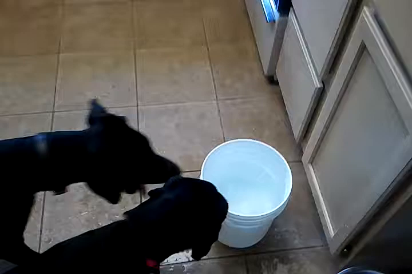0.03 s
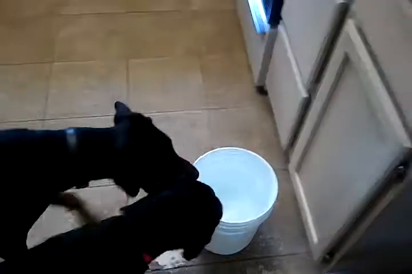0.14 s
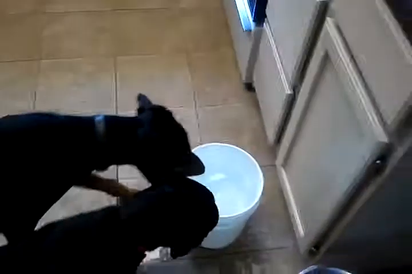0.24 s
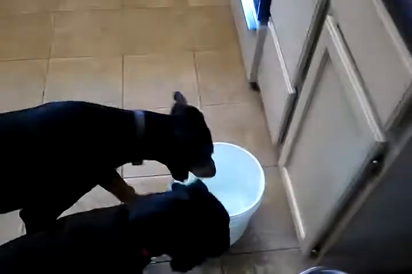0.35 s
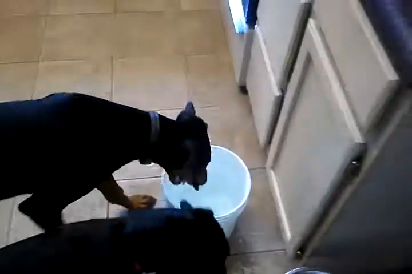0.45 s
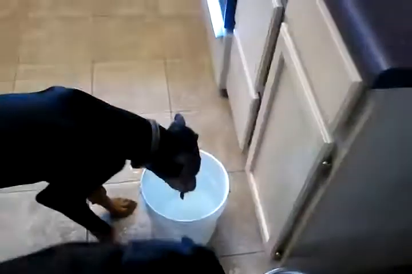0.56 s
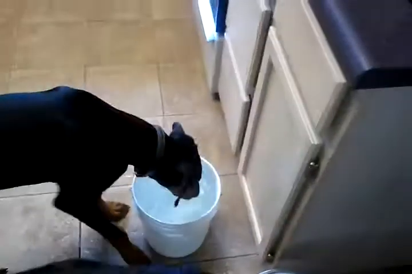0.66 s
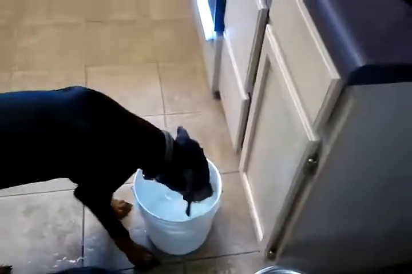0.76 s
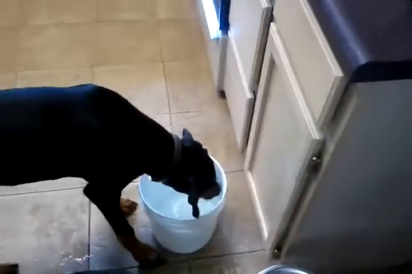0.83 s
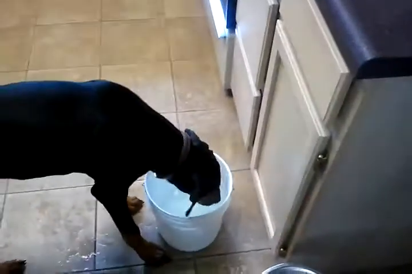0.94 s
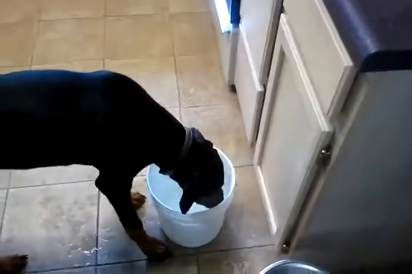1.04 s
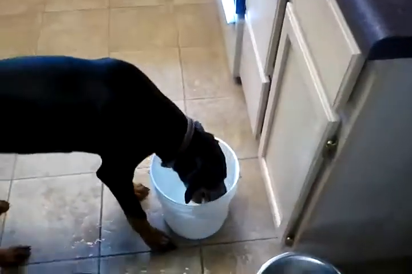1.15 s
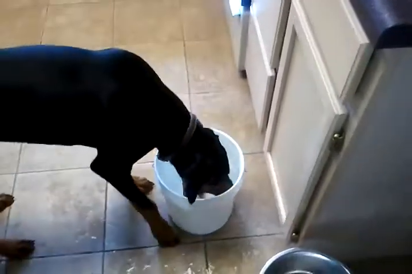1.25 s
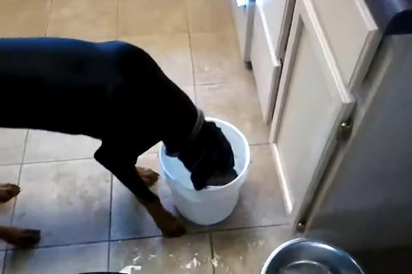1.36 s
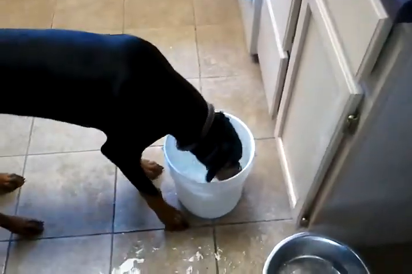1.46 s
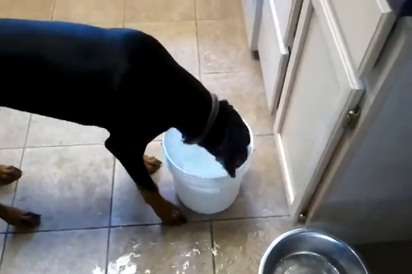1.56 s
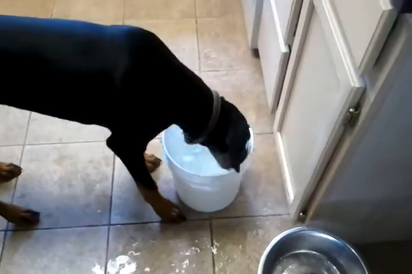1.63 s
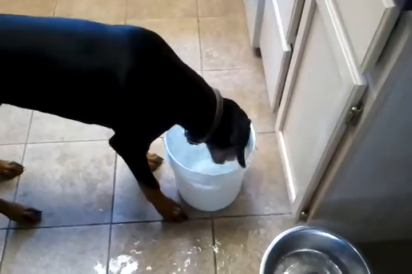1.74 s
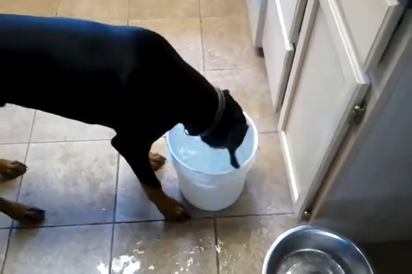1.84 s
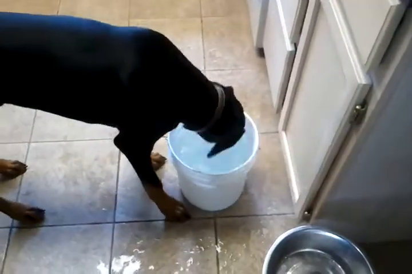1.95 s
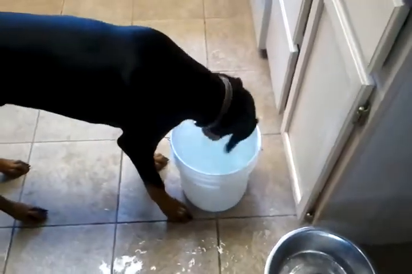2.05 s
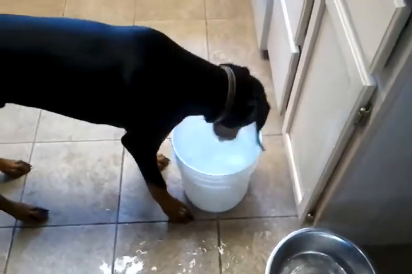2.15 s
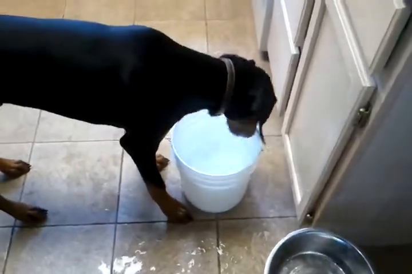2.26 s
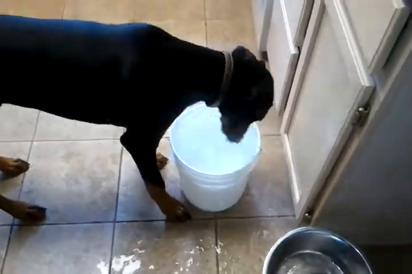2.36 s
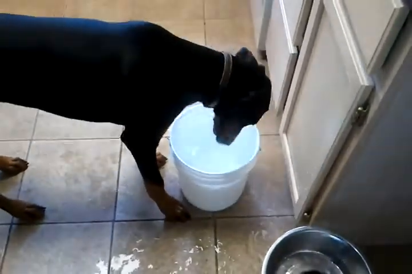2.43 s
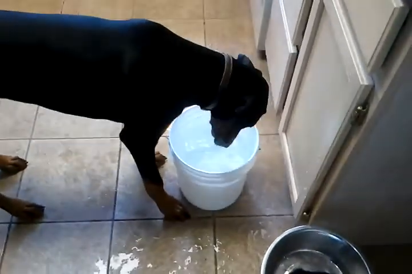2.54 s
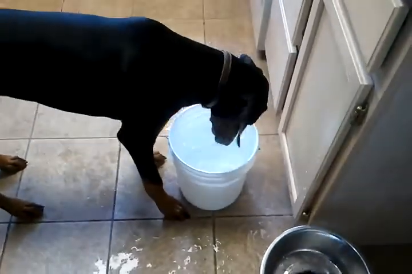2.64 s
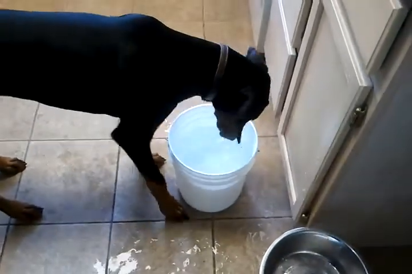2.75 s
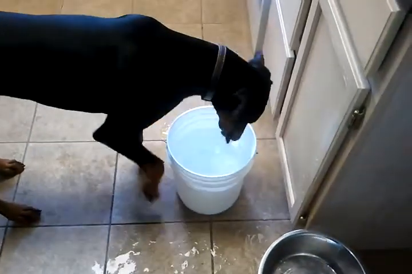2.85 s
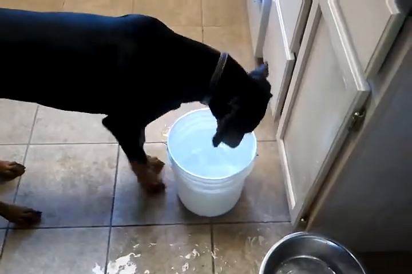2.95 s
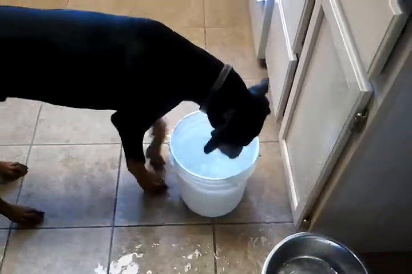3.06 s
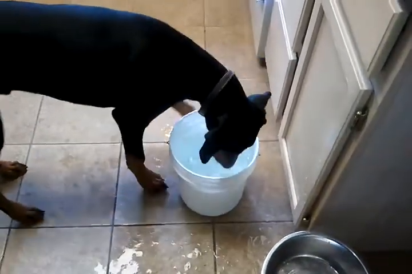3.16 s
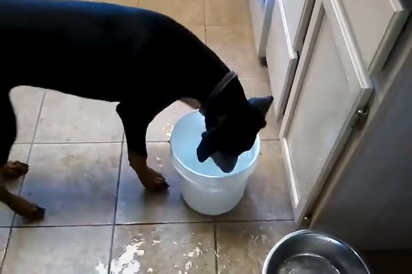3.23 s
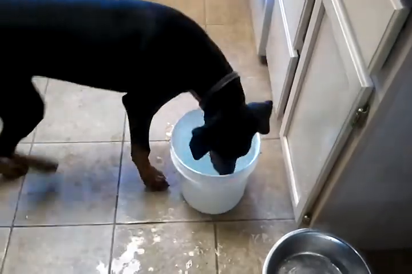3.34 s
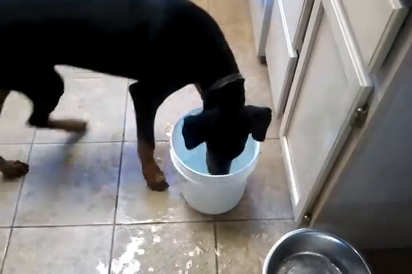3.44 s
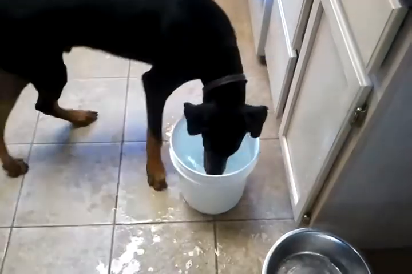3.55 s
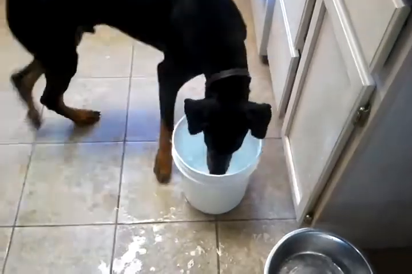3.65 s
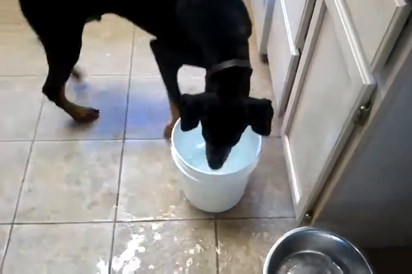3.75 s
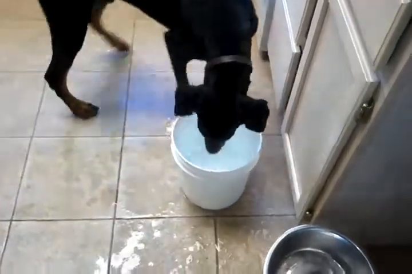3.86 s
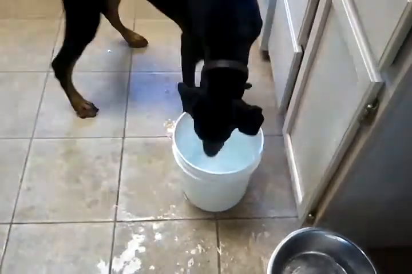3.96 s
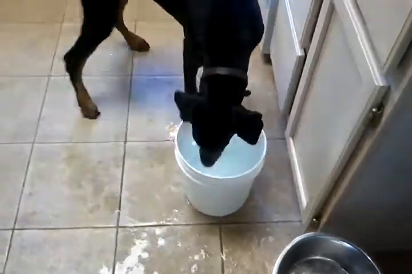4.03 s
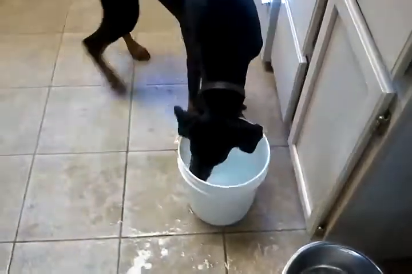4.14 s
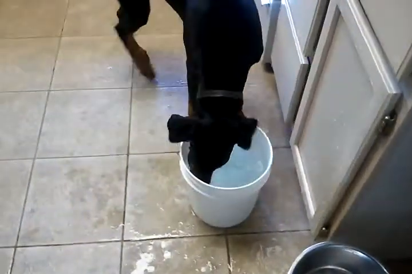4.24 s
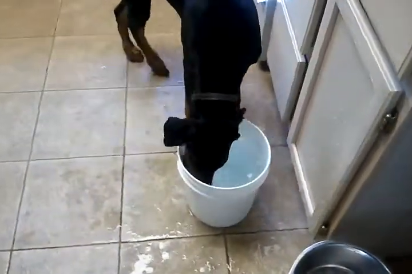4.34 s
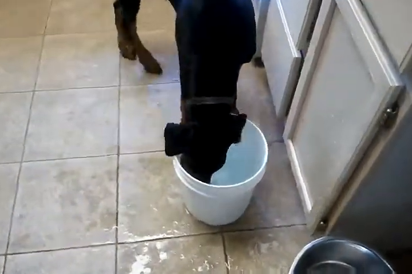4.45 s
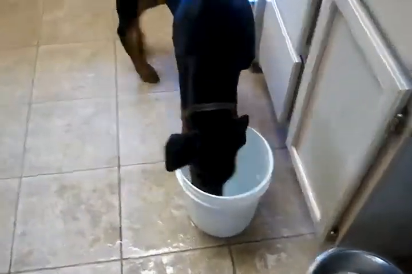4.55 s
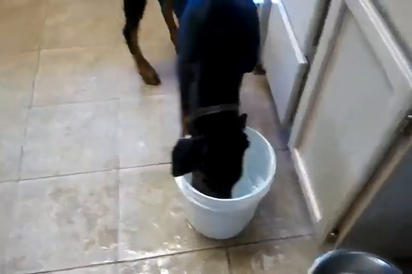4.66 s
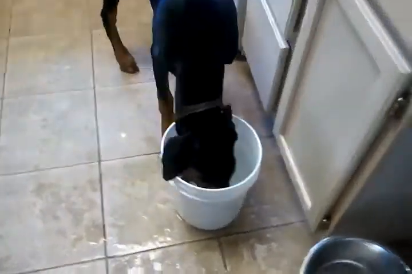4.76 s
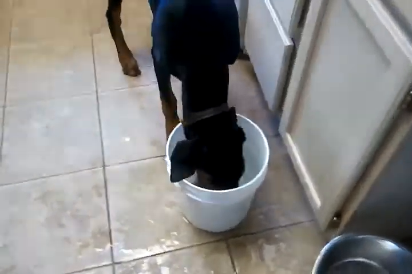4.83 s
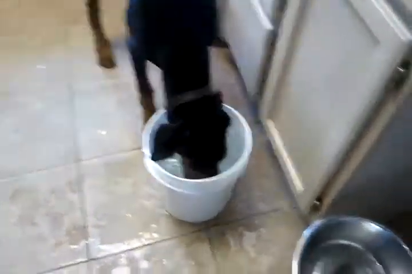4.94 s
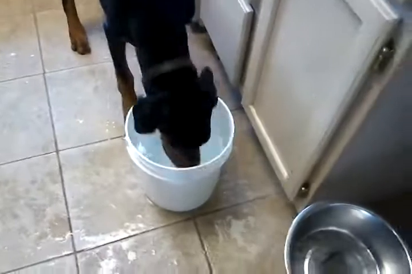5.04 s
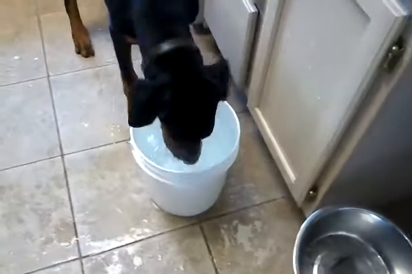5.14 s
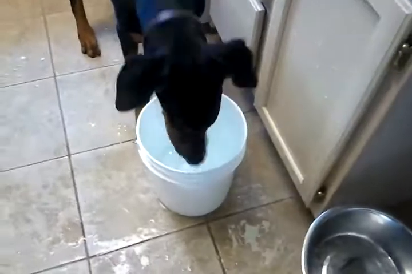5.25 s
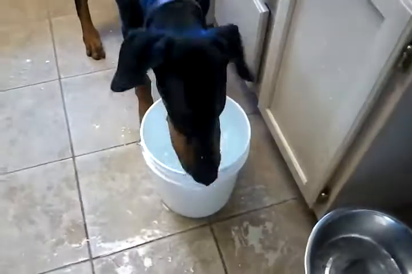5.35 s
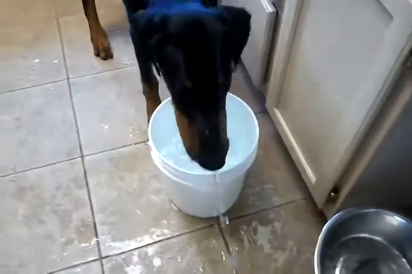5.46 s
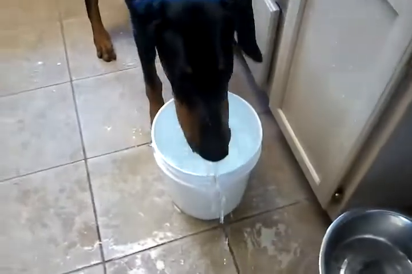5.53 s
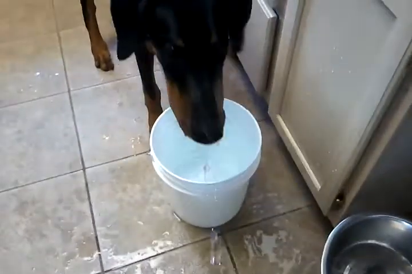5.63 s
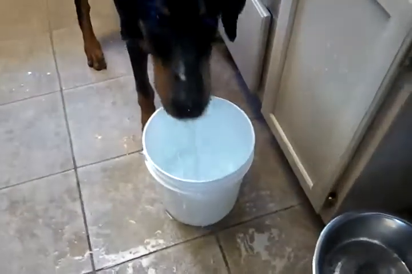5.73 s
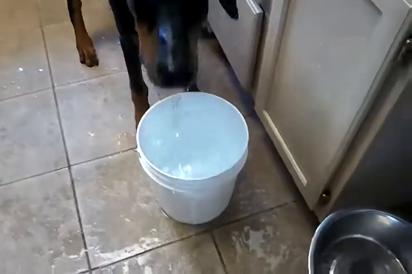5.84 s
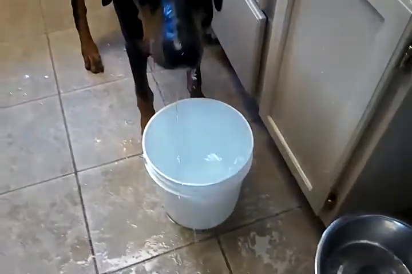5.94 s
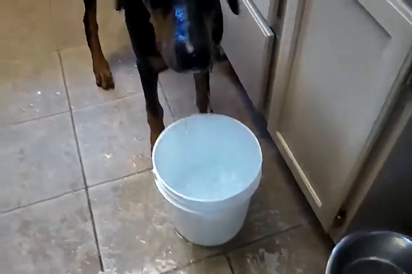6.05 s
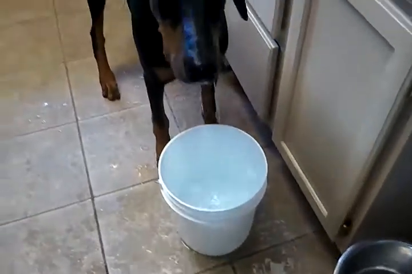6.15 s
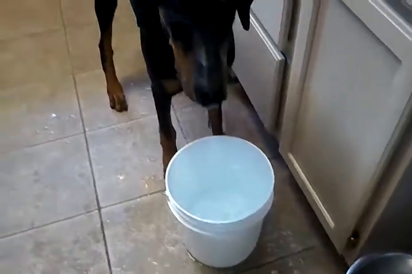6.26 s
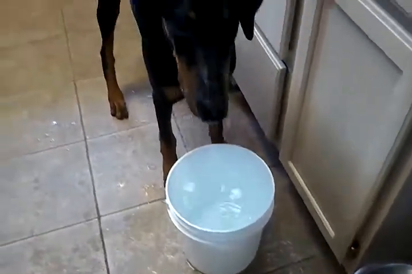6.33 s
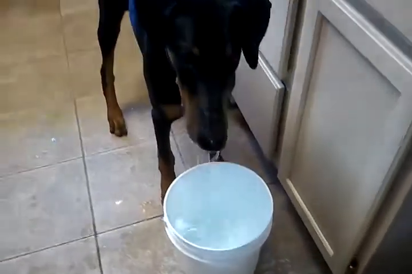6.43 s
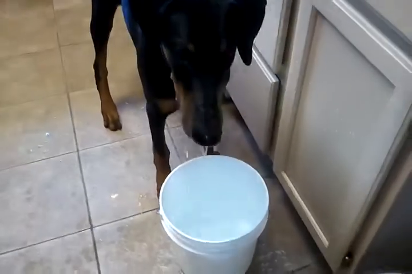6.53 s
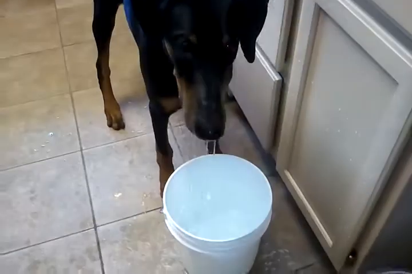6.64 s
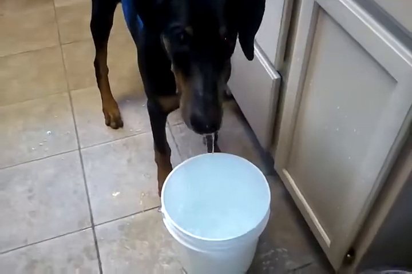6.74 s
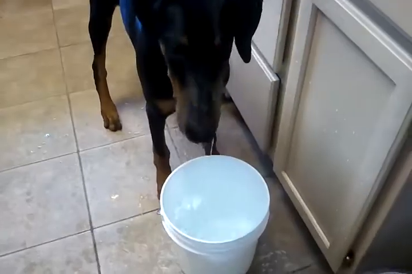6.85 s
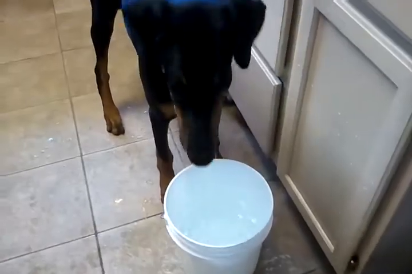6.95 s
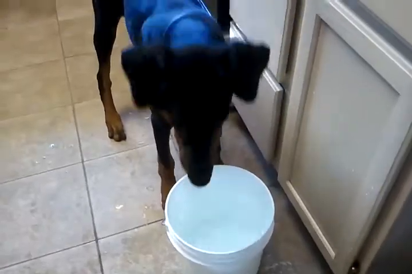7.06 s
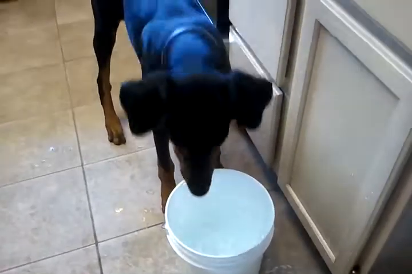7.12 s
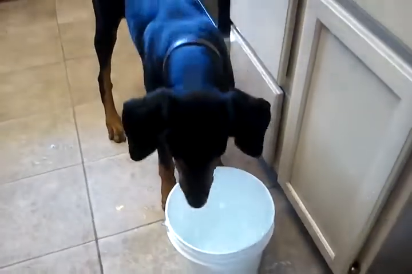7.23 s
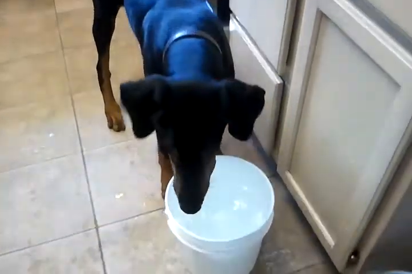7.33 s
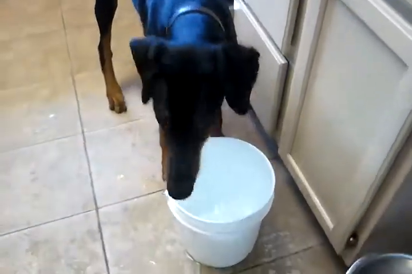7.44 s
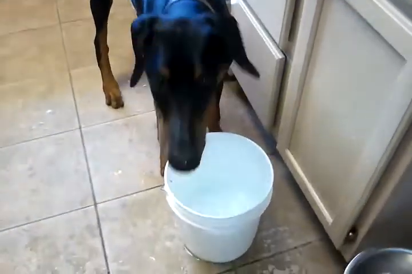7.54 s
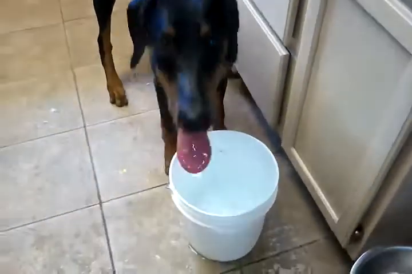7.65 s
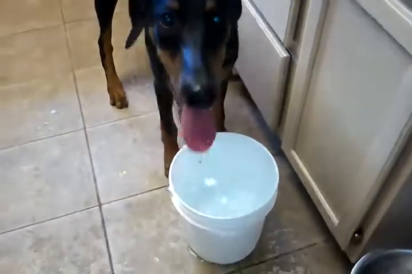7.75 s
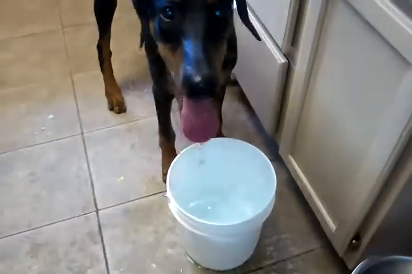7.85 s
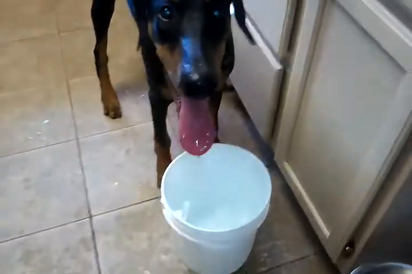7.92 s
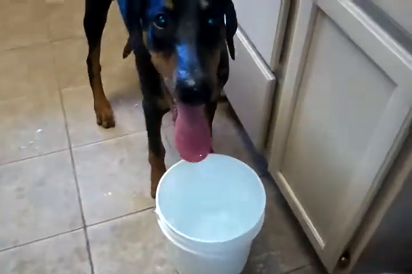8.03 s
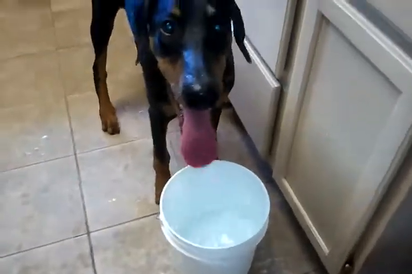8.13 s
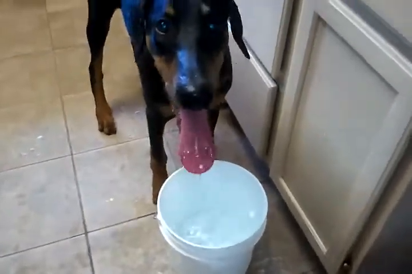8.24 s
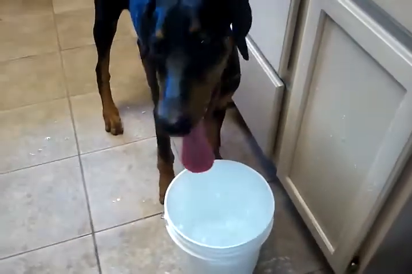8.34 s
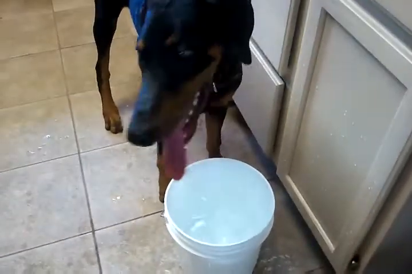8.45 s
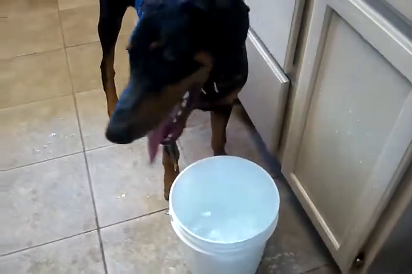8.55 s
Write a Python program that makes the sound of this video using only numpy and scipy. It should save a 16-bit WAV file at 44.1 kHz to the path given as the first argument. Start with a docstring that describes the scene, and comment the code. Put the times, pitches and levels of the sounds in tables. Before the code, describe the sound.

Wet bubbly slurps, crisp drips and spattering drops from a dog at a plastic bucket, a brief snort, a dull bump, ending in metallic tag jingles.

```python
"""Tiled kitchen: a dog laps and splashes in a plastic bucket. Tongue bubbles and drips are damped sines;
splats, spray, slosh and snort are shaped noise; a trickle gurgles in a narrow band.
Two dull bumps hit the bucket. Collar tags ring as metal modes, loudest as the head shakes with a rustle.
A small hand-held camera adds rumble and an offset voltage, and fades in late."""
import sys
import numpy as np
from scipy import signal
from scipy.fft import rfft, irfft, next_fast_len
from scipy.io import wavfile
from scipy.ndimage import uniform_filter1d, map_coordinates

SR = 44100
rng = np.random.default_rng(int(sys.argv[2]) if len(sys.argv) > 2 else 0)


def wav_record(signal):
    """Record a signal, one row per channel, as 16-bit PCM in the file named by sys.argv[1]."""
    frames = np.transpose(np.atleast_2d(signal))
    bounded = np.clip(frames, -1, 1)
    # unit amplitude maps onto the largest positive 16-bit level
    quanta = np.round(bounded * 32767).astype(np.int16)
    wavfile.write(sys.argv[1], SR, quanta)


N = 378819

# big bubbles under the tongue: start_s, level_db, pitch_hz
TONGUE_BUBBLES = [(0.955, -39, 454), (1.047, -32, 445), (1.276, -28, 571), (1.495, -35.5, 485),
                  (1.522, -30, 425), (1.538, -34.5, 1120), (1.568, -20.5, 1063), (1.787, -31, 464),
                  (1.79, -24.5, 1034), (1.831, -36.5, 934), (1.906, -36, 440), (2.493, -43, 435),
                  (4.258, -39, 596), (4.307, -24, 980), (4.551, -29, 342), (4.687, -31.5, 1026),
                  (4.717, -32, 1326), (4.855, -40.5, 1040), (4.942, -37.5, 217), (5.005, -27, 299),
                  (5.007, -22, 641), (5.063, -30.5, 1580), (5.134, -27.5, 1164), (6.538, -32.5, 1500),
                  (6.715, -30, 637), (6.81, -27, 778), (6.831, -31, 617), (7.013, -29, 1250),
                  (7.206, -33, 830), (7.437, -36.5, 1460)]
# small bubbles left by drips: start_s, level_db, pitch_hz
DRIP_BUBBLES = [(1.2765, -32, 2630), (2.0193, -36, 2010), (2.324, -34.5, 4200), (2.371, -34.5, 5630),
                (2.425, -35.5, 5900), (2.8412, -35, 2530), (2.899, -38.5, 5800), (2.956, -42, 4000),
                (4.296, -23.5, 3360), (4.7696, -18.5, 2170), (4.9873, -22.5, 3040), (5.042, -23, 2130),
                (5.125, -29, 2530), (5.228, -33.5, 2370), (5.473, -23.5, 4370), (5.479, -40, 1720),
                (5.487, -30, 4130), (5.502, -32.5, 4670), (5.521, -27, 4330), (5.5514, -31.5, 3100),
                (5.914, -22.5, 4470), (6.3748, -17, 4380), (6.435, -32, 2810), (6.695, -28, 2470),
                (6.755, -24, 2320), (6.8877, -25, 2440), (7.5843, -24.5, 2500)]
# drips on something hard that rings thinly: start_s, level_db, pitch_hz
HARD_PINGS = [(1.424, -44.5, 2958), (2.4165, -49.5, 2744)]
# dull bumps on the bucket: start_s, level_db, pitch_hz
BUCKET_BUMPS = [(3.123, -23, 383), (6.696, -15.5, 211)]
# drops bursting on tiles and water: start_s, level_db, bright_hz
DROP_BURSTS = [(1.0195, -26, 5200), (1.042, -21.5, 7500), (1.0884, -28, 6900), (1.096, -28.5, 5550),
               (2.101, -35, 4600), (2.204, -33.5, 7600), (2.3265, -37, 6960), (2.9535, -39.5, 7400),
               (3.081, -36, 7460), (3.615, -28.5, 6950), (4.2643, -21.5, 6030), (4.4344, -28.5, 6400),
               (4.5018, -33, 7550), (5.5835, -33, 5430), (5.736, -30, 6700), (5.88, -22.5, 7500),
               (5.912, -24, 7660), (5.986, -27.5, 4700), (6.0082, -20.5, 7400), (6.0592, -22.5, 4700),
               (6.166, -34.5, 5600), (6.2188, -20, 7760), (6.2475, -29, 4400), (6.4328, -28, 7140),
               (6.5092, -23.5, 4660), (6.557, -21.5, 5970), (6.719, -20, 7850), (6.8399, -19, 8060),
               (7.0817, -25.5, 7300), (7.1771, -24.5, 6850), (7.4517, -31, 6140), (7.667, -39, 6700)]
# water movement: time_s, spray_db, slosh_db
WATER_MOTION = [(.8, -49, -55.5), (1.0, -55.5, -58), (1.85, -52.5, -55), (2.05, -41.5, -49),
                (2.25, -62.5, -67), (3.55, -63, -64), (4.15, -63.5, -61), (4.53, -54, -54.5),
                (4.59, -45.5, -46.5), (4.9, -50.5, -51.5), (5.3, -52.5, -59.5), (6.6, -53.5, -61),
                (6.9, -47, -51.5), (7.2, -43, -56), (7.43, -49, -60.5), (7.99, -65, -64.5),
                (8.59, -75.5, -58)]
# extra flings of spray: peak_s, level_db
SPRAY_FLINGS = [(1.44, -63), (3.631, -54.5), (4.026, -47.5), (4.298, -46), (5.047, -38), (6.724, -29)]
# spray colour: freq_hz, relative_db
SPRAY_COLOUR = [(1200, -23.5), (2290, -12), (6740, -0.5), (8010, -1), (9300, -15)]
# slosh colour: freq_hz, relative_db
SLOSH_COLOUR = [(120, -3.5), (300, -4.5), (1200, 0.5), (2300, -4), (5000, -17.5)]
# bucket air modes above the water: freq_hz, width_hz, added_db
BUCKET_MODES = [(296, 52, 2.5), (449, 59, 1), (567, 12, -3), (2100, 51, -21.5)]
# nose resonances: freq_hz, width_hz, level_db, glide_share (0-1)
NOSE_MODES = [(2020, 380, -2, 0.94), (4080, 360, -3, 0.75), (4490, 260, -11, 0.05), (7200, 720, -6, 0.1)]
# tag blows: start_s, upper_tag_db, lower_tag_db, big_ring_db, small_ring_db, t60_s
TAG_BLOWS = [(3.8856, -24.5, -32, -46, -40, 0.061), (4.1941, -30, -34.5, -48, -34, 0.11),
             (4.5808, -37, -36, -59, -40, 0.061), (7.2052, -29, -33, -42, -55.5, 0.3),
             (8.0044, -43, -33, -48, -32, 0.027), (8.0196, -25, -46, -65, -32, 0.096),
             (8.0868, -15.5, -28, -37, -31, 0.052), (8.1769, -33, -32.5, -33, -22.5, 0.12),
             (8.1959, -22, -23, -32.5, -18, 0.046), (8.2215, -19.5, -17, -33.5, -26, 0.22),
             (8.276, -22.5, -19.5, -39, -36, 0.1), (8.332, -11, -24.5, -17.5, -26, 0.089),
             (8.3471, -34, -19.5, -28.5, -33, 0.069), (8.377, -10, -8, -17.5, -33, 0.026),
             (8.4037, -30, -26.5, -24.5, -33, 0.043), (8.417, -10, -25, -22, -24.5, 0.031),
             (8.548, -25, -38.5, -59, -34, 0.11), (8.5749, -19, -32, -56, -31.5, 0.31)]
# modes of upper tag, lower tag, big ring, small ring: freq_hz, initial_db
METAL_MODES = [
    [(6910, 0), (6760, -11), (5120, -18)],
    [(6065, 0), (4225, -12), (3320, -12), (4520, -17)],
    [(2940, -2), (3033, -6), (2200, -10)],
    [(7900, -2), (8085, -3), (7450, -9)],
]
# rustle of the head shake: time_s, level_db
SHAKE_LEVEL = [(8.06, -48.5), (8.22, -28.5), (8.32, -34.5), (8.41, -24.5), (8.52, -41.5), (8.59, -39.5)]
# handling rumble: time_s, level_db
HANDLING_LEVEL = [(.8, -59.5), (3.2, -56.5), (8, -59), (8.59, -62)]
# rumble colour: freq_hz, relative_db
RUMBLE_COLOUR = [(10, -14.5), (24, -1.5), (45, -9.5), (130, -15), (260, -37)]
# steady hiss colour: freq_hz, relative_db
HISS_COLOUR = [(90, -20.5), (150, 10), (300, 3.5), (800, -7), (3400, -21), (7040, -28), (9200, -34)]
# room decay: freq_hz, t60_s
ROOM_DECAY = [(200, 0.29), (2000, 0.26), (9000, 0.28)]
# microphone top edge: freq_hz, gain_db
MIC_EDGE_GAIN = [(7800, -1), (8400, -8), (9000, -22.5), (9300, -37)]
# camera fade-in: time_s, gain (linear)
FADE_IN = [(.786, .08), (.9, .45), (1.06, 1)]
# offset voltage: time_s, offset (share of full scale)
OFFSET_VOLTAGE = [(.786, -.052), (6, -.0577), (8.59, -.0565)]

# pitch climb of big bubbles: value at CLIMB_REF_HZ; smaller and louder bubbles climb more
CLIMB, CLIMB_REF_HZ, CLIMB_POWER, CLIMB_PER_DB = 0.3, 980, 0.5, 0.4
BUMP_PUSH_HZ, BUMP_PUSH_DB = 70, -10
FLING_RISE_DB_PER_S, FLING_FALL_DB_PER_S, FLING_SLOSH_DB = 338, 103, -23
SNORT_START_S, SNORT_END_S, SNORT_DB, SNORT_RAMP_S = 1.85, 2.18, -38, 0.036
SNORT_FADE_DB_PER_S = 45  # at the first nose mode; in proportion to pitch at the others
# the glide starts at this share of the mode pitches, then climbs and sags
NOSE_START, NOSE_OPENS_S, NOSE_SAG_PER_S = 0.72, 0.04, 0.6
FLAP_DB, FLAP_HZ = -15, 600  # ears: dull part of the shake
TRICKLE_START_S, TRICKLE_END_S, TRICKLE_DB, TRICKLE_FADE_DB_PER_S = 6.9, 7.45, -55.5, 5
TRICKLE_HZ, TRICKLE_WIDTH_HZ = 2110, 420
HISS_DB = -68.5
TOP_HZ = 9265


def amp(db):
    """dB to gain."""
    return 10 ** (np.asarray(db) / 20)


def unit(x):
    """x at rms 1."""
    return x / np.sqrt(np.mean(x ** 2) + 1e-20)


def along(points, hz):
    """Interpolate (freq_hz, value) points on a log axis."""
    f, v = np.transpose(points)
    return np.interp(np.log(hz + 1), np.log(f + 1), v)


def curves(rows):
    """One value per sample for each column after the time."""
    s, *cols = np.transpose(rows)
    return [np.interp(np.arange(N) / SR, s, c) for c in cols]


def wobble(knots_per_s):
    """Smooth random curve."""
    knots = rng.standard_normal(int(N * knots_per_s / SR) + 4)
    return map_coordinates(knots, [np.arange(N) * knots_per_s / SR])


def filtered(x, response):
    """x times a response of frequency."""
    m = next_fast_len(N + SR // 2)
    return irfft(rfft(x, m) * response(np.fft.rfftfreq(m, 1 / SR)), m)[:N]


def noise(colour, spikes_db=0):
    """Coloured noise of rms 1; spikes make some samples stand out as tiny drops."""
    spikes = amp(spikes_db * np.minimum(rng.exponential(size=N), 7))
    return unit(filtered(rng.standard_normal(N) * spikes, lambda hz: amp(along(colour, hz))))


def narrow_noise(turns, width_hz):
    """Noise of rms 1 around a carrier: two random curves on its cosine and sine."""
    return unit(wobble(width_hz) * np.cos(turns) + wobble(width_hz) * np.sin(turns))


def patchy(x, patchy_db):
    """Random louder and softer patches over time and pitch."""
    z = signal.stft(x, nperseg=256)[2]
    field = uniform_filter1d(rng.standard_normal(z.shape), 5, 0)
    field = uniform_filter1d(field, 16, 1)
    return signal.istft(z * amp(patchy_db * unit(field)), nperseg=256)[1][:N]


def bubbles(s, db, hz, cycles, rise, size):
    """Fast-swelling damped sines; the pitch first climbs through hz as each bubble nears the surface."""
    t = np.arange(size) / SR
    turns = t * hz[:, None]
    age = turns / np.clip(np.reshape(cycles, (-1, 1)), 1, 200)  # 20 dB decay per unit of age
    climb = np.reshape(rise, (-1, 1)) * (np.minimum(age, 2) / 2 - .25)
    swell = 1 - np.exp(-1.5 * turns)
    wave = amp(db[:, None] - 20 * age) * swell * np.sin(2 * np.pi * turns * (1 + climb))
    at = (s * SR).astype(int)[:, None] + np.arange(size)
    return np.bincount(at.ravel(), wave.ravel(), N + size)[:N]


def swarm(count, low_hz, span, cycles, spread_db):
    """Chance bubbles of rms 1, pitches from low_hz to span times higher, a few much louder."""
    draw = rng.random((count, 3))
    s = draw[:, 0] * N / SR
    db = -spread_db * np.log(draw[:, 1] + 0.0064)
    return unit(bubbles(s, db, low_hz * span ** draw[:, 2], cycles, rise=0.37, size=1000))


def bucket(x):
    """The air in the bucket resonates, lifting a few pitches, mostly low."""
    def response(f):
        return 1 + sum(amp(db) * 1j * f * w / (c * c - f * f + 1j * f * w) for c, w, db in BUCKET_MODES)
    return filtered(x, response)


def tongue():
    """Each trapped bubble rings, slaps the surface and breaks off a quieter, mostly higher one."""
    s, db, hz = np.transpose(TONGUE_BUBBLES)
    ratio = hz / CLIMB_REF_HZ
    rise = CLIMB * ratio ** CLIMB_POWER * amp(CLIMB_PER_DB * (db - db.mean()))
    big = bubbles(s, db, hz, 13 * ratio ** 0.2, rise, size=5000)
    later = rng.random((len(s), 2))
    broken_hz = hz * (0.86 + 1.7 * later[:, 1])
    broken = bubbles(s + 0.019 * later[:, 0], db - 15.0, broken_hz, 7.9, rise=0.54, size=2000)
    hits = np.bincount((s * SR).astype(int), amp(db - 20.0), N)
    decay = amp(-60 * np.arange(SR // 4) / SR / 0.13)
    slaps = signal.fftconvolve(hits, decay)[:N] * noise(SLOSH_COLOUR, spikes_db=1.1)
    return big + broken + slaps


def drips():
    """Each drip ticks, rings a small bubble and sheds a droplet; a few ping on something hard."""
    s, db, hz = np.transpose(DRIP_BUBBLES)
    tick = bubbles(s, db - 4.5, 1.2 * hz, 1.5, rise=0, size=200)
    shed_s = s + 0.022 * rng.random(len(s))
    shed = bubbles(shed_s, db - 6, hz * rng.uniform(.9, 2.0, len(s)), 8, rise=0.19, size=500)
    small = bubbles(s, db, hz, 16.6, rise=0.17, size=2000)
    pings = amp(4 * wobble(70)) * bubbles(*np.transpose(HARD_PINGS), 100, rise=0.02, size=5000)
    return tick + shed + small + pings


def bumps():
    """A short dull ring in the bucket over one low push."""
    s, db, hz = np.transpose(BUCKET_BUMPS)
    ring = bubbles(s, db, hz, 1, rise=0, size=3000)
    push = bubbles(s, db + BUMP_PUSH_DB, BUMP_PUSH_HZ + 0 * hz, 1, rise=0, size=6000)
    return bucket(ring) + push


def splats():
    """A bursting drop is a noise crack, boosted around one pitch, with a softer, slower tail."""
    out, t = np.zeros(N + SR), np.arange(2048) / SR
    hz = np.fft.rfftfreq(len(t), 1 / SR)
    shape = 0.85 * amp(-60 * t / 0.01) + 0.26 * amp(-60 * t / 0.075)
    shape = shape * (1 - np.exp(-t / 0.00041))
    for s, db, bright_hz in DROP_BURSTS:
        boost = 0.27 + 1 / (1 + ((hz - bright_hz) / 600) ** 2)
        colour = amp(along(SPRAY_COLOUR, hz)) * boost + .08
        burst = unit(irfft(rfft(rng.standard_normal(len(t))) * colour))
        out[round(s * SR):][:len(t)] += amp(db) * burst * shape
    return out[:N]


def flings():
    """Gain of the flung spray: each fling swells fast and dies slower."""
    gain = np.zeros(N)
    for s, db in SPRAY_FLINGS:
        t = np.arange(N) / SR - s
        gain += amp(db + np.minimum(FLING_RISE_DB_PER_S * t, -FLING_FALL_DB_PER_S * t))
    return gain


def stirred_water():
    """Spray and slosh: spiky, patchy noise plus chance bubbles, louder as the water moves."""
    spray_db, slosh_db = curves(WATER_MOTION)
    flung = flings()
    spray = patchy(noise(SPRAY_COLOUR, spikes_db=2.6), patchy_db=3.0)
    spray = spray + 0.22 * swarm(count=700, low_hz=2500, span=3.2, cycles=15, spread_db=6)
    slosh = patchy(noise(SLOSH_COLOUR, spikes_db=2.26), patchy_db=3.5)
    slosh = slosh + 0.45 * swarm(count=1600, low_hz=490, span=5, cycles=12, spread_db=4.5)
    spray_gain = (amp(spray_db) + flung) * amp(3.0 * wobble(25) + 2.43 * wobble(150))
    slosh_gain = (amp(slosh_db) + amp(FLING_SLOSH_DB) * flung) * amp(1.8 * wobble(45))
    return bucket(spray_gain * spray) + slosh_gain * bucket(slosh)


def tags():
    """Each blow rings four metal pieces; weak modes die sooner, loose contact makes all waver."""
    out, t = np.zeros(N + SR), np.arange(SR // 4) / SR
    for s, *pieces, t60 in TAG_BLOWS:
        ring = 0
        for db, modes in zip(pieces, METAL_MODES):
            for hz, level in modes:
                flutter_db = np.interp(t, np.linspace(0, t[-1], 45), rng.normal(0, 4.2, 45))
                gain = amp(db + level * (1 + t / .09) + flutter_db)
                detuned_hz = hz * (1 + 0.002 * rng.normal())
                ring = ring + gain * np.sin(2 * np.pi * detuned_hz * t + 7 * rng.random())
        bright = np.convolve(rng.standard_normal(len(t)), [1, -.45], "same")
        clack = amp(max(pieces) - 9 - 60 * t / 0.05) * bright
        ring = ring * amp(-60 * t / t60) * (1 - np.exp(-t / 0.0014))
        out[round(s * SR):][:len(t)] += ring + clack
    return out[:N]


def snort():
    """Wet air through the nose: noise in broad resonances, the lower ones climbing as nostrils open."""
    t, air = np.clip(np.arange(N) / SR - SNORT_START_S, 0, None), 0
    glide = 1 - (1 - NOSE_START) * np.exp(-t / NOSE_OPENS_S) - NOSE_SAG_PER_S * t
    for hz, width_hz, db, share in NOSE_MODES:
        turns = 2 * np.pi * np.cumsum(hz * np.clip(glide, .5, 1) ** share) / SR
        fade_db = SNORT_FADE_DB_PER_S * t * hz / NOSE_MODES[0][0]
        air = air + amp(db + 3.5 * wobble(35) - fade_db) * narrow_noise(turns, width_hz)
    ending = np.clip((SNORT_END_S - SNORT_START_S - t) / SNORT_RAMP_S, 0, 1)
    shape = np.minimum(t / SNORT_RAMP_S, 1) * ending
    return air * shape * amp(SNORT_DB + 0.6 * wobble(60))


def shake():
    """Collar and fur rustle as bright noise, ears as dull noise, while the head shakes."""
    def dull(hz):
        return hz * FLAP_HZ / (FLAP_HZ ** 2 + hz ** 4 / FLAP_HZ ** 2)
    rustle = patchy(noise(SPRAY_COLOUR, spikes_db=1.8), patchy_db=3.5)
    ears = unit(filtered(noise(SLOSH_COLOUR, spikes_db=1.9), dull))
    gain = amp(curves(SHAKE_LEVEL)[0] + 2.7 * wobble(45))
    started = np.arange(N) > SHAKE_LEVEL[0][0] * SR
    return gain * (rustle + amp(FLAP_DB) * ears) * started


def trickle():
    """Water running off the muzzle gurgles in a narrow band with an uneven level."""
    t = np.arange(N) / SR
    band = narrow_noise(2 * np.pi * TRICKLE_HZ * t, TRICKLE_WIDTH_HZ)
    gurgle = amp(6 * wobble(14))
    fade = amp(TRICKLE_DB - TRICKLE_FADE_DB_PER_S * (t - TRICKLE_START_S))
    return band * gurgle * fade * (t > TRICKLE_START_S) * (t < TRICKLE_END_S)


def kitchen(x):
    """Tiles and cupboards answer with a short diffuse tail, drawn anew every quarter second."""
    out, step = np.zeros(N + SR), SR // 4
    for start in range(0, N, step):
        hz, t, z = signal.stft(rng.standard_normal(SR // 2), SR, nperseg=256)
        decay = amp(-60 * t / along(ROOM_DECAY, hz)[:, None])
        tail = signal.istft(z * decay, SR, nperseg=256)[1]
        wet = signal.fftconvolve(x[start:start + step], tail / np.linalg.norm(tail))
        out[start + 130:][:len(wet)] += wet  # 130 samples: about 3 ms
    return out[:N]


def handling():
    """Low noise of the hand on the camera, unsteady in level."""
    return amp(curves(HANDLING_LEVEL)[0] + 2.5 * wobble(14)) * noise(RUMBLE_COLOUR)


def hiss():
    """Steady noise with the bucket's resonances, drifting slowly in level."""
    return amp(HISS_DB + 2.4 * wobble(1.8)) * bucket(noise(HISS_COLOUR))


def scene():
    """Near sounds with their room, over stirred water, hiss and handling rumble."""
    near, drops, metal = tongue() + drips() + bumps(), splats(), tags()
    room = kitchen(amp(-1) * near + amp(-3.5) * drops + amp(-4.5) * metal)
    dog = snort() + shake() + trickle()
    return (near + drops + metal + room + stirred_water() + dog + handling() + hiss())[None]


def record(dry):
    """The microphone's top edge, an offset voltage, the late fade-in and the band limit."""
    coloured = filtered(dry[0], lambda hz: amp(along(MIC_EDGE_GAIN, hz)))
    faded = (coloured + curves(OFFSET_VOLTAGE)[0]) * curves(FADE_IN)[0]
    limited = filtered(faded, lambda hz: hz < TOP_HZ)
    started = np.arange(N) > FADE_IN[0][0] * SR
    return (limited * started)[None]


dry = scene()
out = record(dry)
wav_record(out)
```